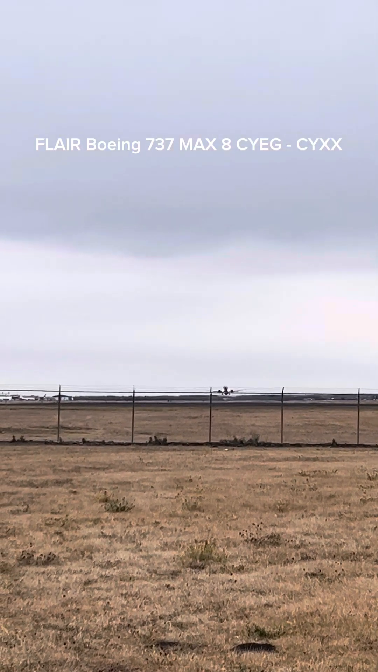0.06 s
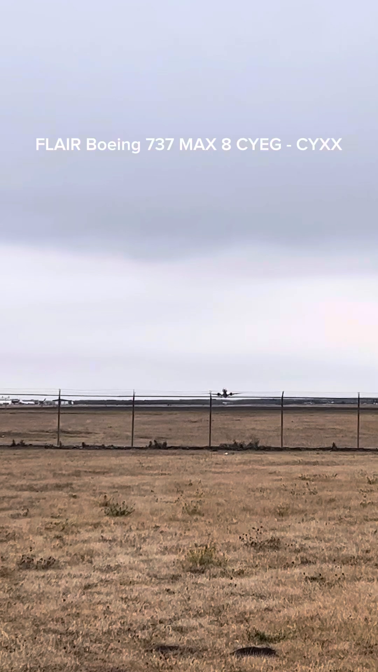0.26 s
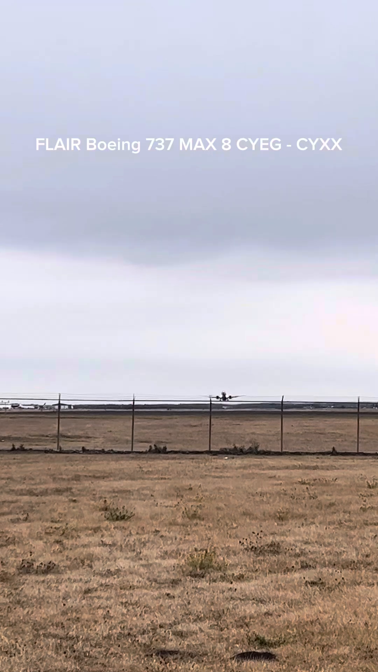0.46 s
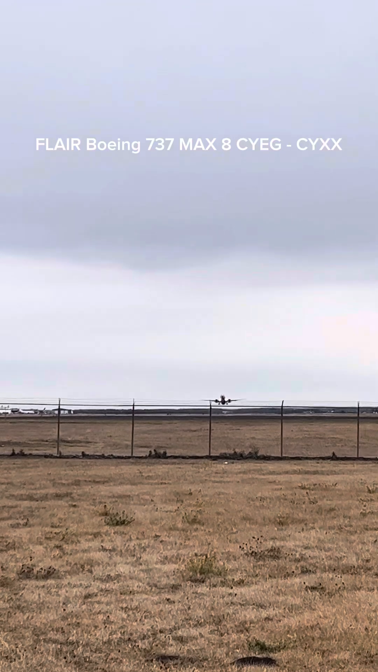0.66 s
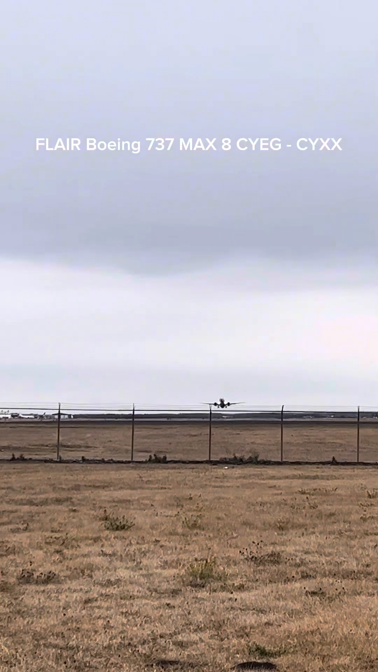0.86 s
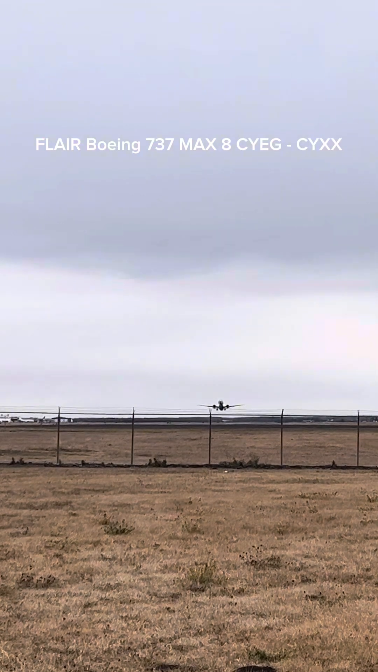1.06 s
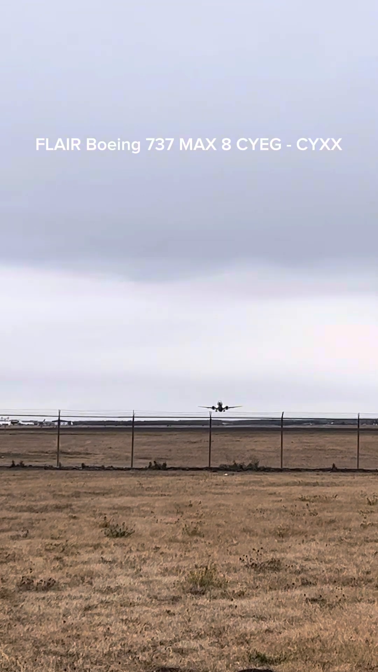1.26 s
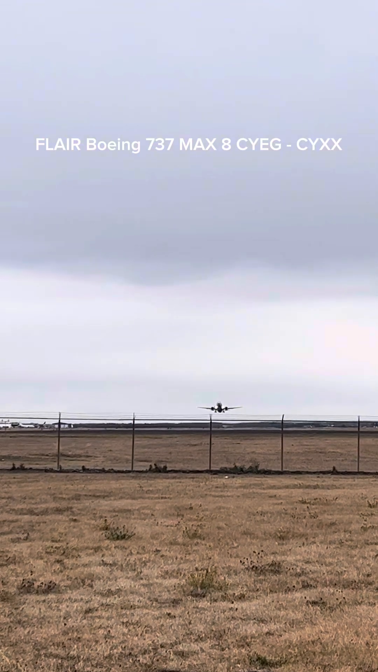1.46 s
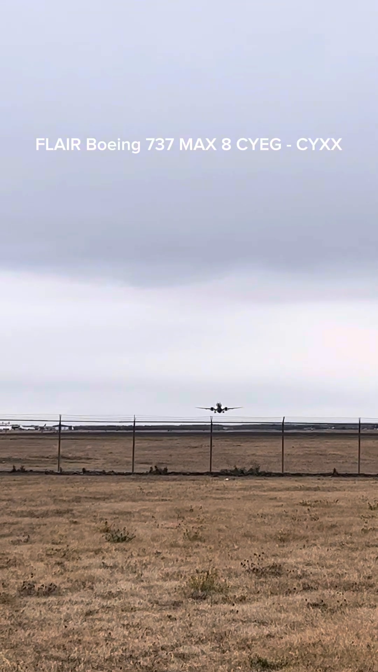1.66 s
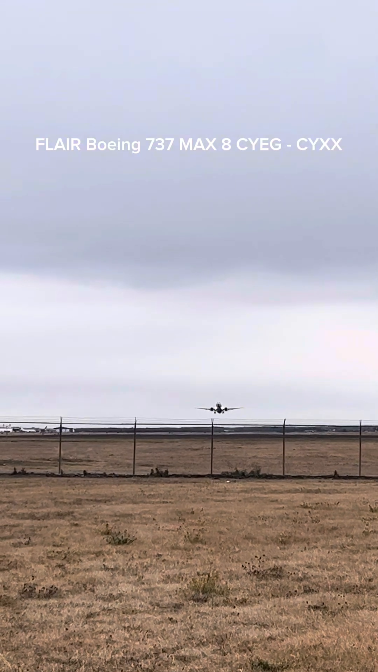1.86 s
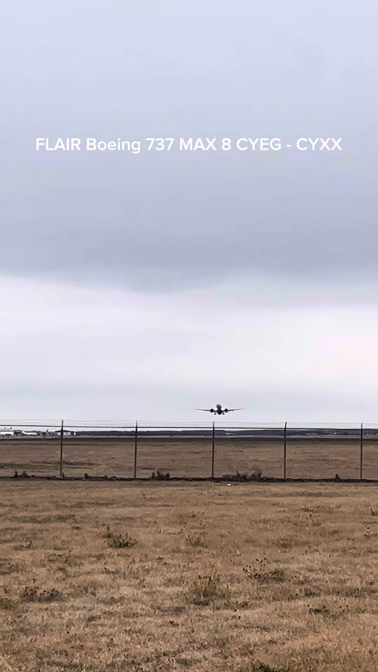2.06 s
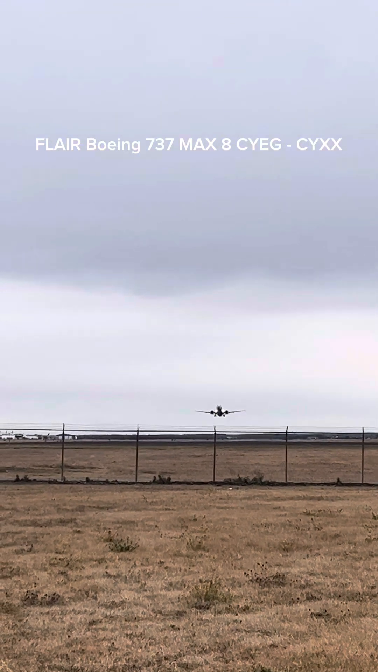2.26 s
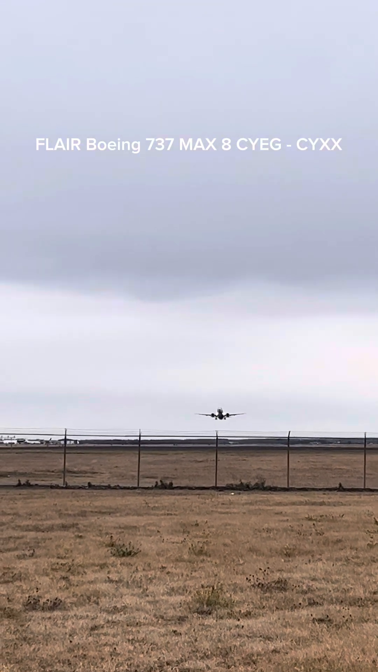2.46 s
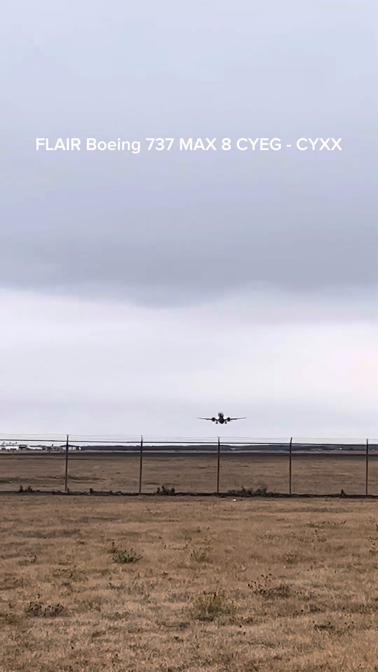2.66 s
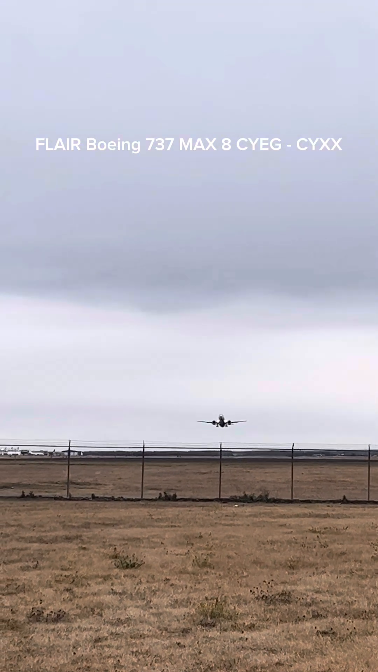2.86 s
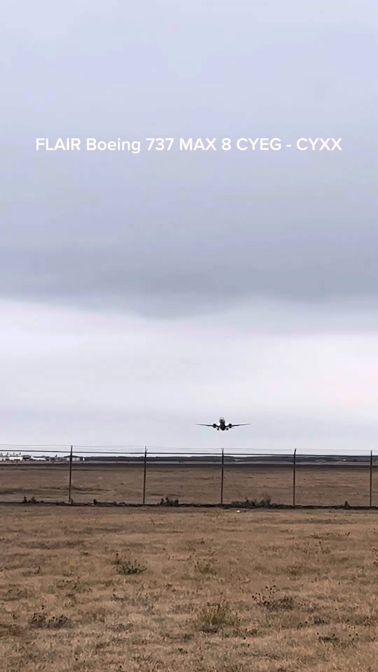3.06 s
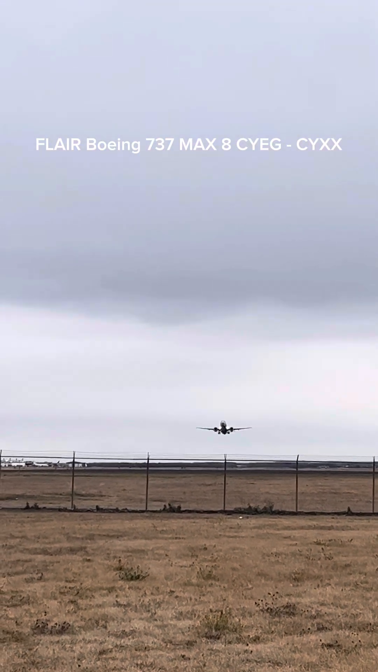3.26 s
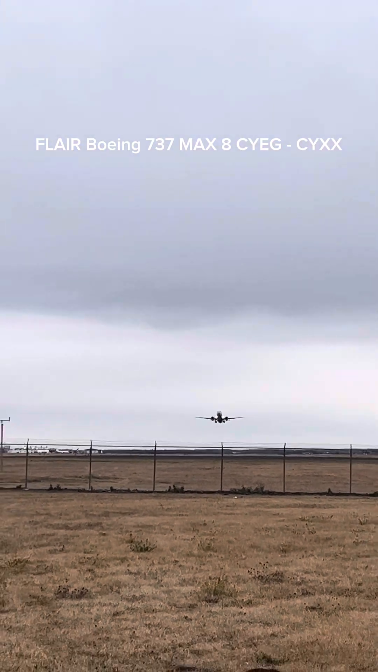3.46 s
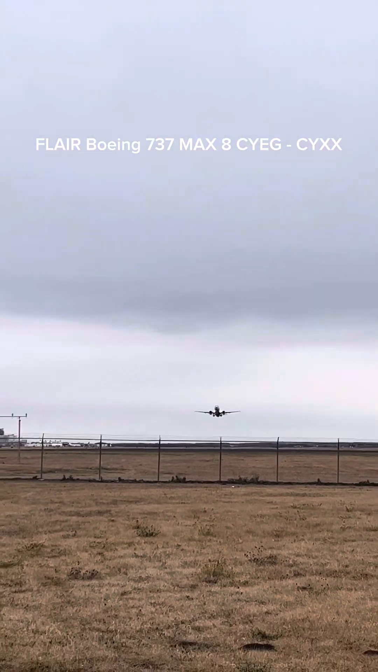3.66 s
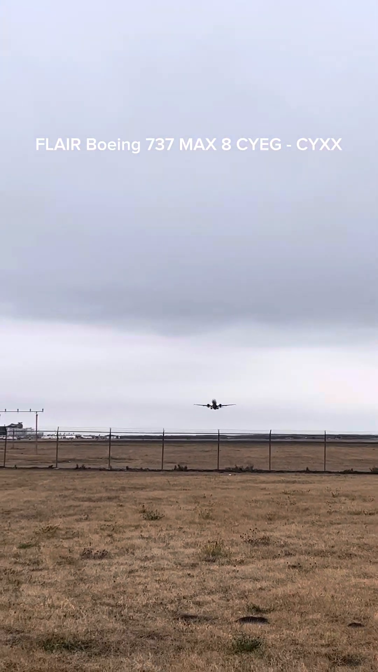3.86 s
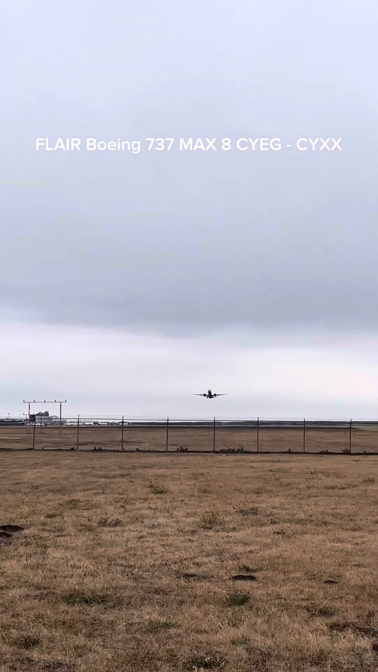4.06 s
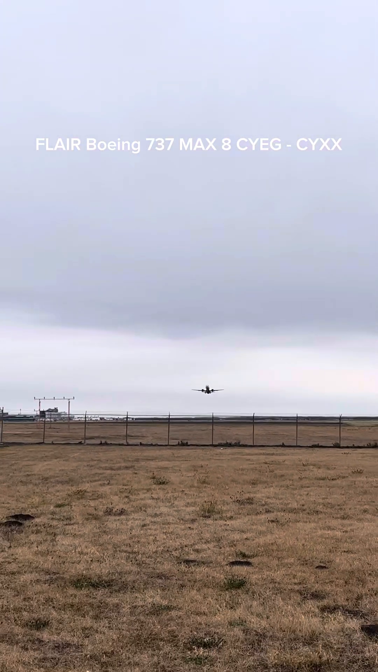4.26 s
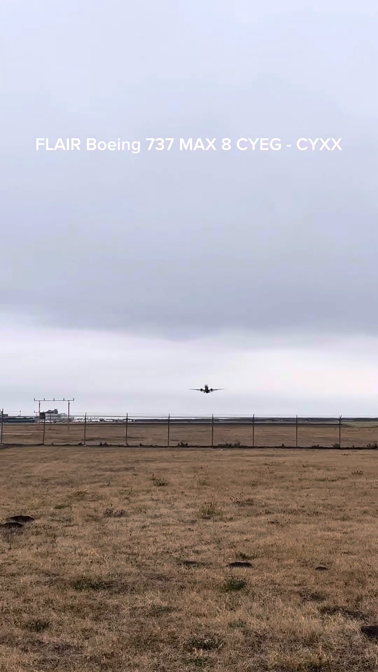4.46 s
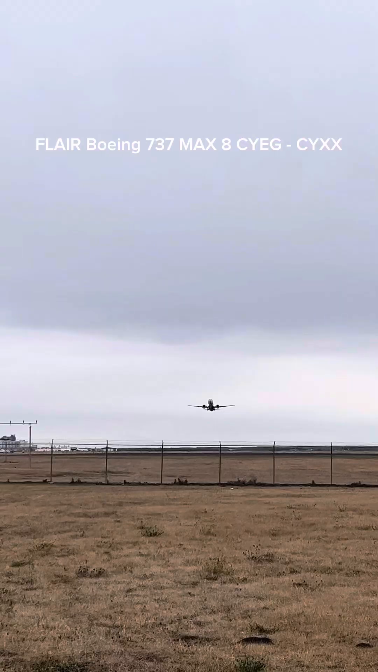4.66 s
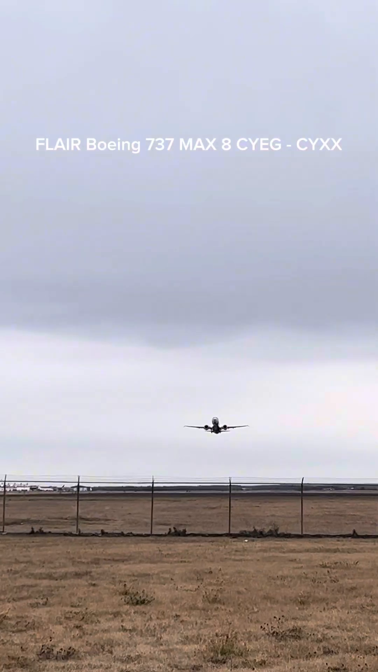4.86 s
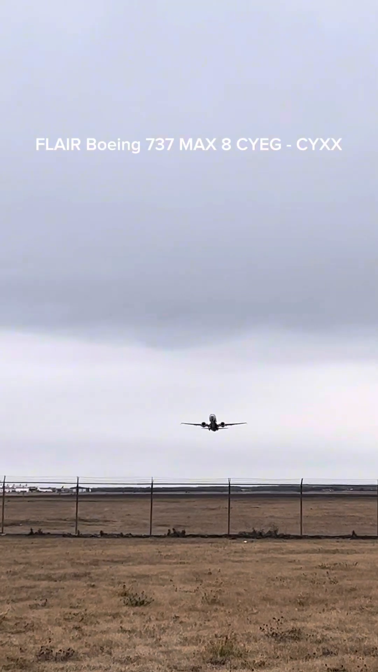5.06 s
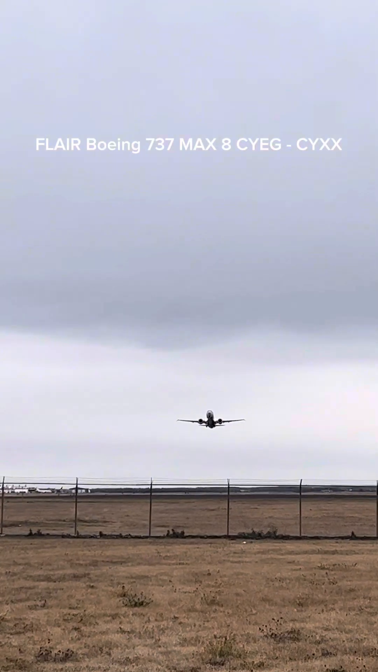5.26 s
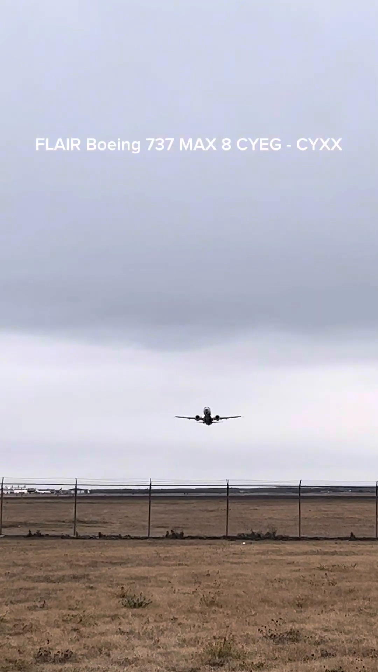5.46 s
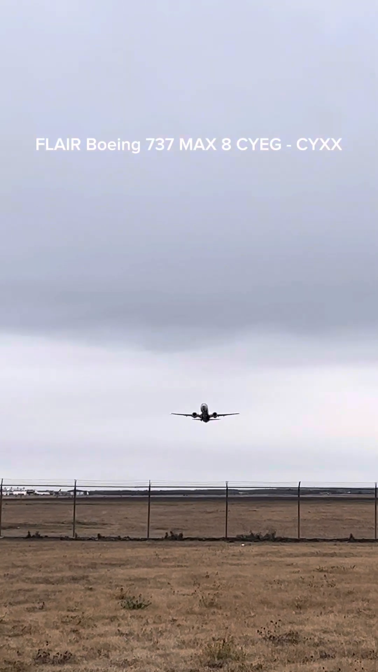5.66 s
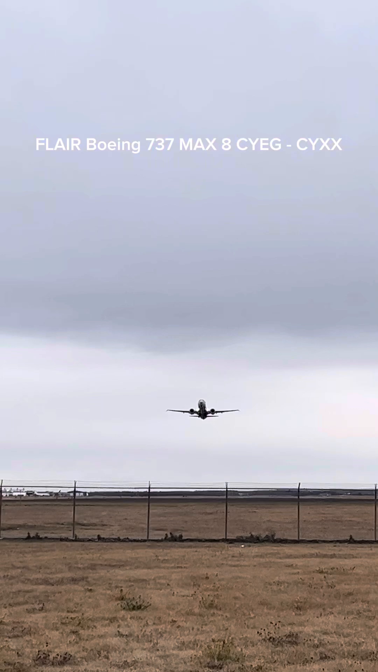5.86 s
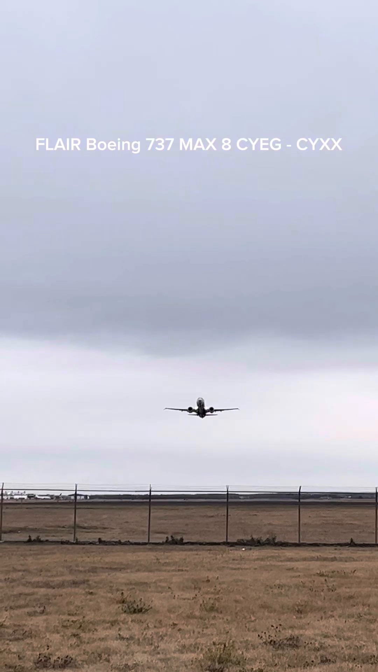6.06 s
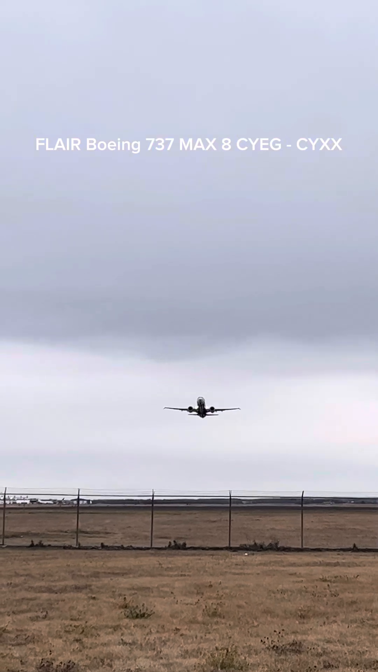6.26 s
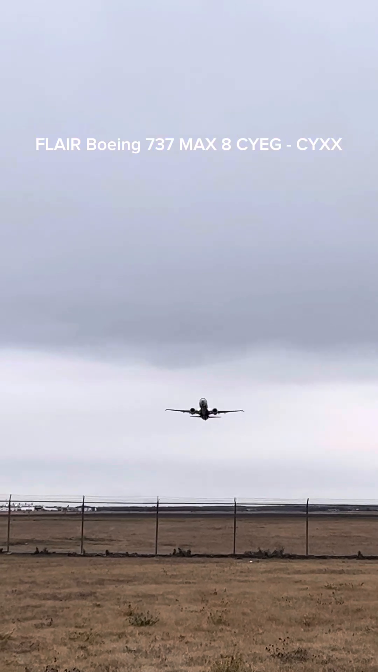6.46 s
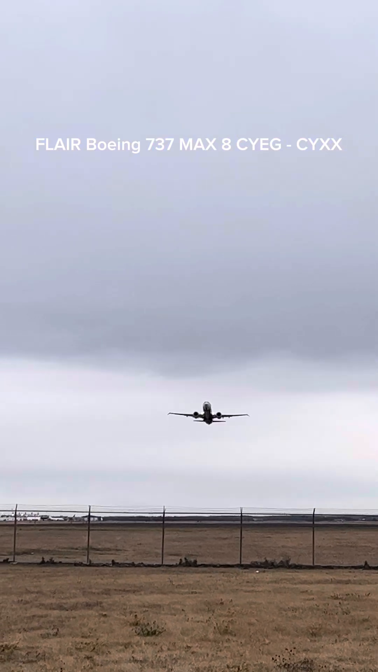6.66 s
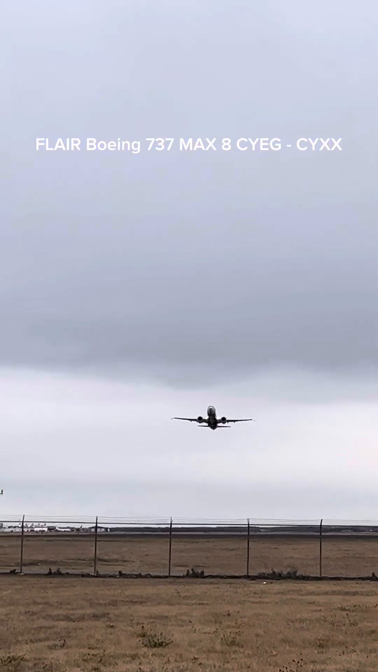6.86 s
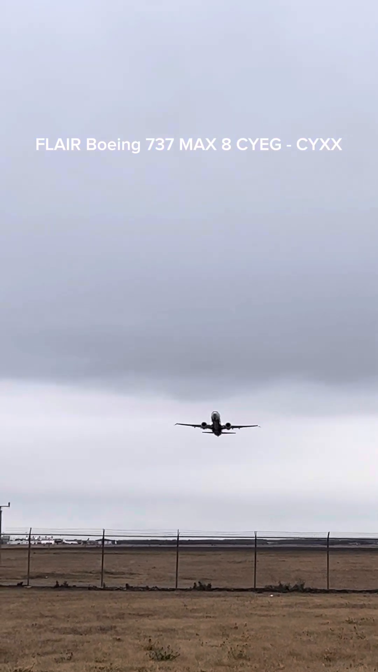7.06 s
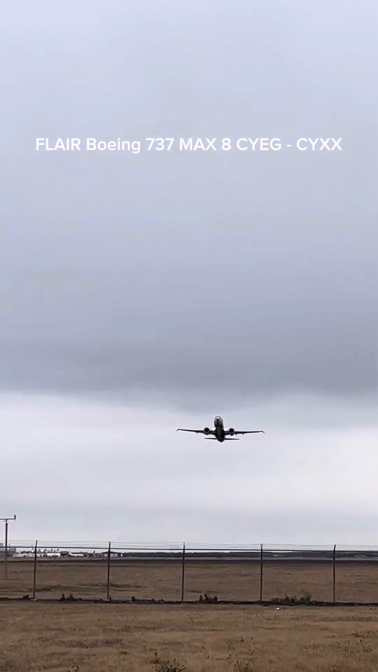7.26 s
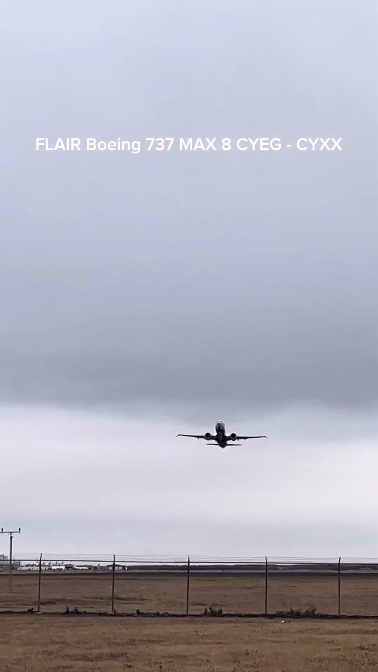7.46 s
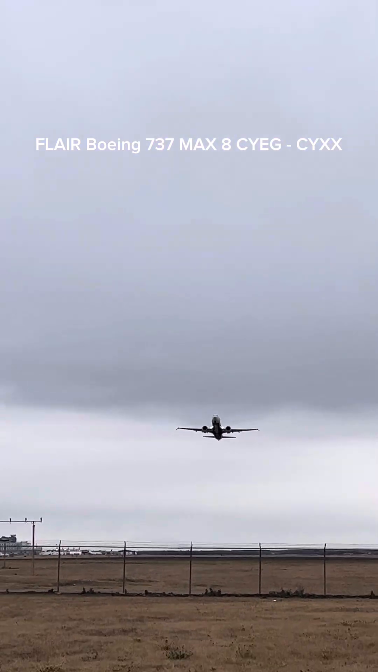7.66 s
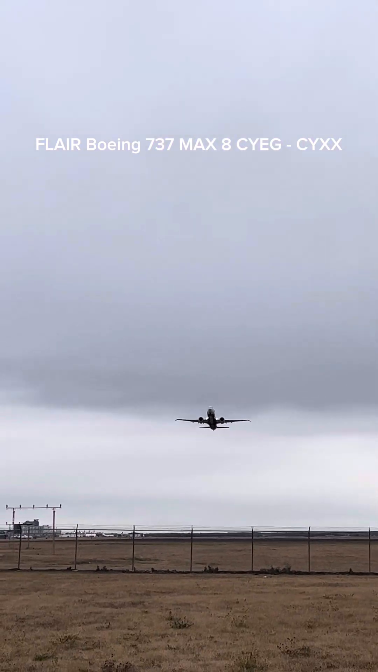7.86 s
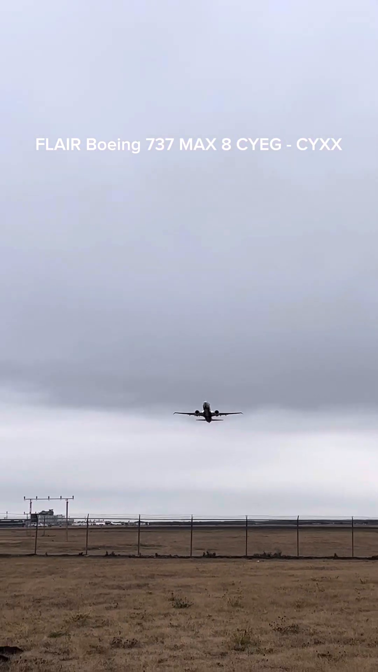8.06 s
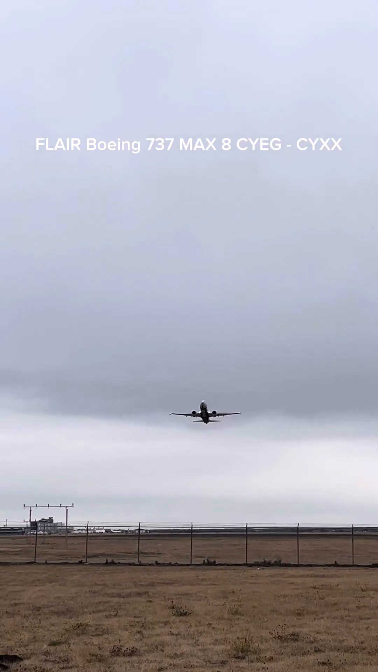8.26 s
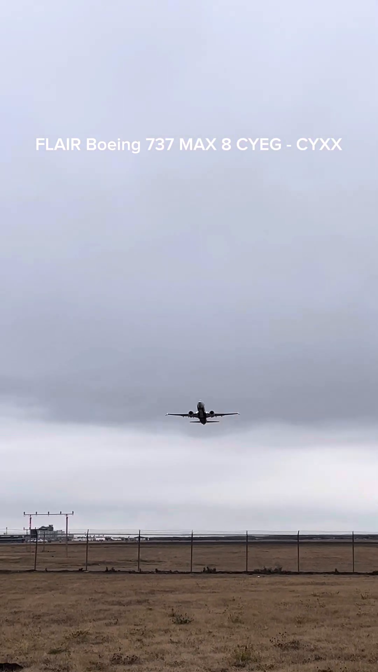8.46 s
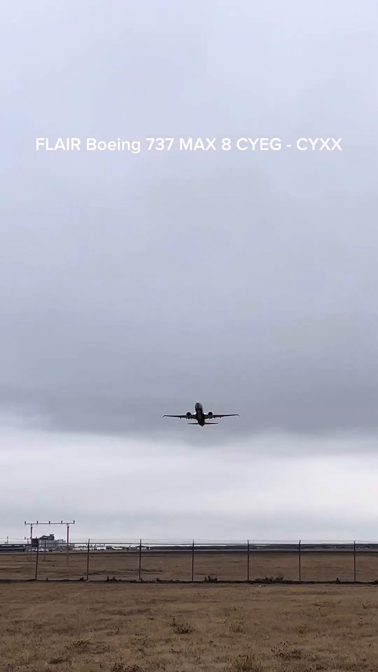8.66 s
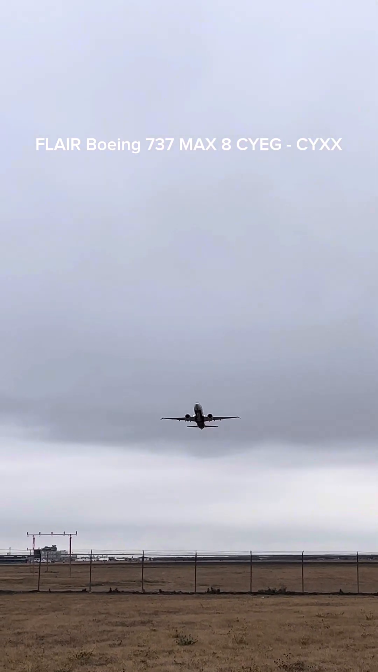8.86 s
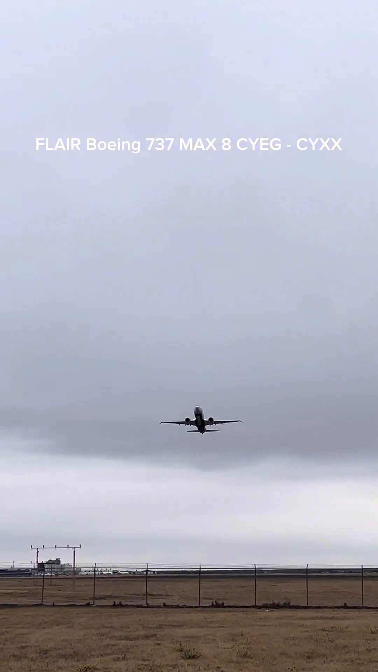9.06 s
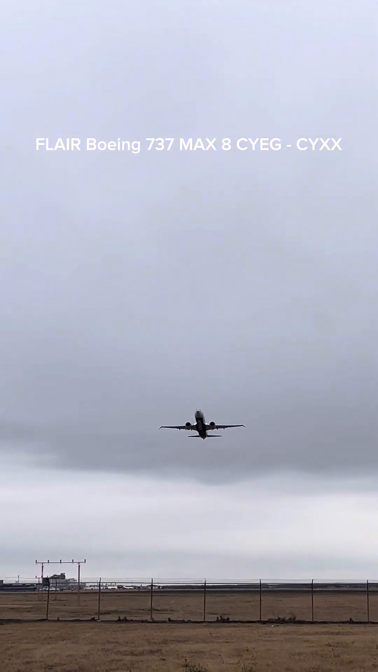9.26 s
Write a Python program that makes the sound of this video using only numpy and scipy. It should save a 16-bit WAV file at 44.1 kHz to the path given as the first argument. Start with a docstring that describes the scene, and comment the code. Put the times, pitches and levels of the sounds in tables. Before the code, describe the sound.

A twin-engine jet climbs toward the listener, low rumble swelling into a roar with a high fan whine, while a truck pulls away nearby.

```python
"""Airliner climbing over a field, truck pulling away

A twin-engine airliner nears a hand-held phone: rumble, roar and hiss are noise shaped frame by frame,
and the fan whine is a pair of wavering sines that swell through gusty air. Beside the field a
six-cylinder truck pulls away through two gears, built from firing tones and the tones of uneven cylinders,
with tyre and traffic noise. Short faint hums come early; knocks on the phone case are a tick and decaying modes.
"""
import sys
import numpy as np
from scipy import signal
from scipy.fft import rfft, irfft, next_fast_len
from scipy.io import wavfile
from scipy.ndimage import uniform_filter1d

SR = 44100
rng = np.random.default_rng(int(sys.argv[2]) if len(sys.argv) > 2 else 0)


def generate_wav(signal):
    """Clip the signal to [-1, 1] and save it as 16-bit WAV at the path in sys.argv[1]."""
    frames = np.transpose(np.atleast_2d(signal))
    scaled = np.clip(frames, -1, 1) * 32767
    pcm = np.round(scaled).astype(np.int16)
    wavfile.write(sys.argv[1], SR, pcm)


N = 410218  # length in samples

# The truck's pull in each gear, one table a gear: [t/s, firing rate f/Hz, load level/dB,
# extra level of the third firing tone/dB, unevenness of the cylinders/dB]
GEARS = [
    [(.8, 66.2, -0.5, 1, -3), (1.05, 69.5, -7, -1, -1.5), (1.8, 71.2, -1, -0.5, -6.5),
     (2.3, 75.26, 0, 3, 1), (3.05, 83.93, -0.5, 3.5, 0.5), (3.3, 86.44, -2.5, 9.5, 1.5),
     (3.55, 89.76, -2, -7, -5), (3.9, 91.5, 0.5, 0, -8.5), (4.1, 93.1, -14.5, 8, -2),
     (4.3, 87.4, -23, -2, -9)],
    [(5.4, 80.3, -8.5, 2.5, 2), (5.8, 80.53, -5, -0.5, -1.5), (6.4, 84.44, 3.5, -3.5, 2.5),
     (7.0, 88.72, 3, 1.5, -1.5), (7.35, 92.4, 3.5, 2, -3), (7.63, 92.94, -0.5, 13, 1.5),
     (7.8, 86.9, -8.5, 21, 3.5)],
]
REFERENCE_FIRING_HZ = 80  # truck levels that grow with speed are set at this firing rate


def gain_of(db):
    """Amplitude ratio of a level in dB."""
    return 10 ** (np.asarray(db) / 20)


def evened(x):
    """Scales x to an RMS of 1."""
    return x / np.sqrt(np.mean(x ** 2) + 1e-20)


def read(points, hz):
    """Reads a curve of (f/Hz, value) points, straight over log frequency."""
    f, value = np.transpose(points)
    return np.interp(np.log(hz + 1), np.log(f + 1), value)


def colour(points, hz):
    """A noise spectrum scaled to power 1, silent above its last point."""
    gain = gain_of(read(points, hz)) * (hz <= points[-1][0])
    return gain / np.linalg.norm(gain)


def drift(t, top_hz):
    """Slow chance movement of RMS 1: sines of random phase up to top_hz, the slow ones stronger."""
    rates_hz = np.geomspace(top_hz / 12, top_hz, 24)
    return evened(sum(np.sin(2 * np.pi * (f * t + rng.random())) / np.sqrt(f) for f in rates_hz))


def tone(t, hz, db, wobble_db, wobble_hz):
    """A sine at an RMS level in dB, whose strength and phase waver in the moving air."""
    phase = 2 * np.pi * np.cumsum(hz) / SR + .25 * drift(t, wobble_hz)
    strength = np.sqrt(2) * gain_of(db + wobble_db * drift(t, wobble_hz))
    return strength * np.sin(phase)


def shaped(x, gain_at):
    """Filters x by a gain, possibly complex, that depends on frequency."""
    size = next_fast_len(N + SR // 2)
    return irfft(rfft(x, size) * gain_at(np.fft.rfftfreq(size, 1 / SR)), size)[..., :N]


def jet_layers(t):
    """Jet noise as (spectrum, level/dB over t) layers that rise as the aircraft nears and turns its inlets."""
    # Aircraft's pass: [t/s, gain from nearing/dB, gain while the fan inlets face the listener/dB,
    # swell of the fan hiss/dB]
    jet = [(0, 1.5, -4.5, 1), (.7, 0, -0.5, -3.5), (2.7, -1.5, 0.5, 2.5), (3.7, 8, -0.5, 0),
           (4.301, 6, 1.5, 2), (4.699, 4.5, 2.5, 1.5), (5.6, 12, 0, 0), (6.299, 14.5, 2.5, -2),
           (6.749, 18, 1, -1.5), (7.1, 23, 4.5, 2.5), (7.399, 27, 1.5, 2.5), (7.6, 27.5, 1, 2.5),
           (7.8, 27.5, 3.5, -3.5), (8.1, 28, 1.5, -1), (8.6, 29, 1.5, 0), (8.75, 28, -3, 3),
           (9.3, 28, -4.5, 3.5)]
    # Noise colours, from exhaust to fan: [f/Hz, relative level per Hz/dB]
    rumble = [(25, -9), (60, 8), (110, 4.5), (170, -2.5), (260, -13), (420, -25), (900, -76.5)]
    roar = [(120, -35.5), (230, 3.5), (400, 8), (520, 1.5), (650, 8.5), (900, -3), (1500, -43)]
    low_roar = [(90, -23), (160, 2.5), (300, -6.5), (450, -17), (900, -28)]
    fan_roar = [(500, -20.5), (900, -2), (1300, -0.5), (1600, -7.5), (1850, -17), (2500, -61.5)]
    fan_hiss = [(1200, -41), (1700, 1), (2150, -1), (2500, -8.5), (3200, -51)]
    treble = [(1800, -31), (2600, 0.5), (3400, -4.5), (4200, -14.5), (5200, -24.5), (5900, -60.5)]
    # Top treble hiss: [f/Hz, relative level per Hz/dB]
    air = [(3000, -39), (4500, -7.5), (5900, -12), (7600, -3.5), (9600, -1), (10400, -14), (12000, -9.5),
           (13600, -12)]
    # Top treble opening late in the scene: [t/s, level/dB]
    air_db = [(0, -91.5), (7.5, -87.5), (8, -76.5), (9.3, -72.5)]
    # Brief blooms of the treble hiss: [t/s, half length/s, rise/dB]
    blooms = [(7.247, .2, 1.5), (8.502, 0.15, 4)]

    s, near_db, facing_db, swell_db = np.transpose(jet)
    bloom_db = sum(db * np.exp(-((t - at) / half) ** 2) for at, half, db in blooms)

    def level(far_db, per_near_db, per_facing_db, extra_db=0):
        return np.interp(t, s, far_db + per_near_db * near_db + per_facing_db * facing_db + extra_db)

    return [
        (rumble, level(-35, 0.34, 0.67)),
        (roar, level(-56.5, 0.9, -0.32)),
        (fan_roar, level(-58, 0.98, 0.88)),
        (fan_hiss, level(-70.5, 0.96, 0.57, swell_db)),
        (treble, level(-77.5, 0.89, -0.85) + bloom_db),
        (low_roar, level(-64.5, 0.86, -2.9)),
        (treble, -69.5 - 18 * t),  # a thin hiss dies away at the start, in dB and dB a second
        (air, np.interp(t, *np.transpose(air_db))),
    ]


def wash():
    """Jet and road noise as random short-time spectra, patchy where gusts bend the path."""
    # Ground echo cancelling a band of the noise, mostly lower as the aircraft climbs:
    # [t/s, centre f/Hz, level change/dB]
    dip = [(6.5, 1937, 0), (7.2, 1856, -1.5), (7.7, 1890, 0.5), (8.05, 1860, -3), (8.4, 1870, 0),
           (8.75, 1685, -9.5), (9.1, 1620, -7), (9.3, 1576, -4.5)]
    # Left-right likeness of the noise: [f/Hz, correlation]
    same_points = [(60, 1), (300, 1), (700, 0.97), (1400, 0.98), (6000, 0.9), (12000, 0.8)]
    # Tyre, engine and traffic noise: [f/Hz, relative level per Hz/dB]
    road_colour = [(90, -23.5), (160, 0), (300, -5.5), (450, -7.5), (900, -12), (2000, -33.5), (3500, -41),
                   (5000, -73.5)]
    hop, size = 512, 2048  # samples
    dip_width_hz = 170

    frames, hz = N // hop + 5, np.fft.rfftfreq(size, 1 / SR)
    t = np.arange(frames) * hop / SR
    layers = jet_layers(t) + [(road_colour, road_db(t))]
    gain = np.sqrt(sum(np.outer(colour(c, hz), gain_of(db)) ** 2 for c, db in layers))
    dip_s, dip_hz, dip_db = np.transpose(dip)
    dip_shape = np.exp(-((hz[:, None] - np.interp(t, dip_s, dip_hz)) / dip_width_hz) ** 2)
    gain *= gain_of(np.interp(t, dip_s, dip_db) * dip_shape)

    a, b, c, d, patches = rng.standard_normal((5, len(hz), frames))
    patches = evened(uniform_filter1d(uniform_filter1d(patches, 16, 0), 8, 1))
    same = np.clip(read(same_points, hz), -1, 1)[:, None]
    left = a + 1j * b
    right = same * left + np.sqrt(1 - same ** 2) * (c + 1j * d)
    spectra = np.array([left, right])

    # the steep mean colour is applied last, so that loud bass does not smear into the treble
    usual = gain.mean(1) + 1e-12
    gusts_db_gain = gain_of(.9 * patches + .5 * drift(t, 5.8))
    spectra *= gain / usual[:, None] * gusts_db_gain
    flat = signal.istft(spectra, nperseg=size, noverlap=size - hop)[1][:, :N]
    return 1.28 * shaped(flat, lambda f: np.interp(f, hz, usual))  # lifts all the noise layers


def whine():
    """Blade-rate tone of the fans and its overtone; the pitch creeps up as the aircraft gathers speed."""
    # Whine fading in and out through the moving air: [t/s, blade tone level/dB, overtone level/dB]
    levels = [(0, -68, -100), (1, -70, -100), (3.1, -65, -92), (3.25, -56.5, -99.5), (3.4, -65, -94),
              (3.52, -55, -100), (4.201, -55.5, -102.5), (4.7, -50, -88), (4.95, -63.5, -84),
              (5.55, -56, -81), (5.85, -52, -72.5), (6.35, -53.5, -84), (6.849, -35, -61),
              (7.08, -32.5, -62.5), (7.3, -27.5, -72.5), (7.6, -41.5, -59), (7.95, -29.5, -63.5),
              (8.249, -27.5, -60), (8.36, -34.5, -65.5), (8.42, -26, -47), (8.58, -30.5, -51),
              (8.75, -40, -60), (9.0, -37.5, -63), (9.15, -55, -68), (9.3, -30, -54)]
    top_hz, short_hz, settle_s = 1481, 55, 3.6  # the blade rate closes in on its top
    t = np.arange(N) / SR
    hz = top_hz - short_hz * np.exp(-t / settle_s)
    s, low_db, high_db = np.transpose(levels)
    low_wobble_db = np.interp(t, [3, 3.6], [4.5, 1.1])  # steadier after the first seconds
    low = tone(t, hz, np.interp(t, s, low_db), low_wobble_db, 18)
    high = tone(t, 2 * hz, np.interp(t, s, high_db), 2., 25)
    return low + high


def truck():
    """Three firings a turn, coloured by the exhaust pipe; cylinders that differ add tones at single turns."""
    # Exhaust pipe response: [f/Hz, level/dB]
    pipe = [(66, -46), (70, -24), (78, -23), (85, -31), (92, -41.5), (135, -53.5), (147, -43), (160, -39.5),
            (172, -34), (186, -34), (200, -67), (250, -55), (278, -40.5)]
    # Tones of the uneven cylinders: [multiple of the shaft's turning rate, relative level/dB]
    uneven = [(2, 9), (4, 11), (7, -7), (8, -10), (10, 0), (11, -9), (12, 3), (13, 0), (15, -6), (16, -4),
              (17, -7), (18, -4)]
    # Lowest firing tone, weaker in the higher gear: [level/dB], one a gear
    drone_levels = (0, -9)
    uneven_levels, uneven_db_per_hz = (-54.5, -61), 0.78  # dB a gear at the reference rate; rise with speed
    panel_hz, panel_width_hz, panel_db = 292, 16, 6  # body resonance lifting uneven tones that cross it

    out = np.zeros(N)
    for gear, gear_db, drone_db in zip(GEARS, uneven_levels, drone_levels):
        s, *columns = np.transpose(gear)
        t = np.arange(s[0], s[-1], 1 / SR)
        hz, load_db, bite_db, rough_db = (np.interp(t, s, c) for c in columns)
        sound = np.zeros(len(t))
        for k in range(1, 4):
            db = load_db + read(pipe, k * hz) + bite_db * (k == 3) + drone_db * (k == 1)
            sound += tone(t, k * hz, db, 0.3, 5)
        uneven_db = gear_db + load_db + rough_db + uneven_db_per_hz * (hz - REFERENCE_FIRING_HZ)
        for k, db in uneven:
            turn_hz = k * hz / 3
            lift_db = panel_db * np.exp(-((turn_hz - panel_hz) / panel_width_hz) ** 2)
            sound += tone(t, turn_hz, uneven_db + db + lift_db, 1.6, 4)
        out[round(s[0] * SR):][:len(t)] += sound * signal.windows.tukey(len(t), .08)
    return out


def road_db(t):
    """Level of far traffic plus the truck's tyre and engine wash, which grows with speed and load."""
    traffic_db = -52.5
    wash_levels, wash_db_per_hz = (-48, -46.5), .5  # dB a gear at the reference rate; rise with speed
    power = gain_of(traffic_db + 0 * t) ** 2
    for gear, gear_db in zip(GEARS, wash_levels):
        s, hz, load_db, *_ = np.transpose(gear)
        wash_db = gear_db + load_db + wash_db_per_hz * (hz - REFERENCE_FIRING_HZ)
        power += gain_of(np.interp(t, s, wash_db, -120, -120)) ** 2
    return 10 * np.log10(power)


def knocks():
    """A thin tick at first touch, then the case rings for a few cycles; held so it sounds lower, it rings longer."""
    # Knocks on the case: [t/s, ring peak level/dB, extra level of the modes above 1 kHz/dB,
    # pitch ratio set by the grip (the modes above 1 kHz move by its square root)]
    blows = [(1.8637, -28, -6, .7), (2.6245, -31, -8, 1), (2.6285, -27, -8, 1.2), (2.647, -27, 3, .82),
             (3.0755, -18, 3, .72), (3.092, -28, -1, 1.1), (4.128, -32, -2, 1.25), (4.475, -1.5, 0, 1),
             (4.4865, -29, -10, .8), (5.040, -32, -4, 1.15), (5.7732, -25, -6, 1.22),
             (5.7746, -24, -8, .66)]
    # Modes of the case at grip ratio 1: [f/Hz, level/dB, t60/s]
    case = [(350, -13, .0114), (620, -16, .015), (764, 0, .0076), (1196, -17, .008), (1430, -4, .0056)]
    # Colour of the first touch: [f/Hz, relative level per Hz/dB]
    tick_colour = [(1500, -8), (2300, 0), (3200, 3), (4200, -6), (5200, -1), (6300, -11), (7900, 2),
                   (9500, -6), (10300, -26), (11300, -14), (13500, -26)]

    out, t = np.zeros(N), np.arange(2048) / SR
    hz = np.fft.rfftfreq(len(t), 1 / SR)
    late = np.maximum(t - .002, 0)  # the case answers just after the tick
    tick = irfft(colour(tick_colour, hz) * np.exp(-2j * np.pi * hz * .0018))  # delayed by 1.8 ms
    tick /= abs(tick).max()
    for s, db, upper_db, grip in blows:
        ring = np.zeros(len(t))
        for f, mode_db, t60 in case:
            upper = f > 1000
            mode_hz = f * grip ** (.5 if upper else 1)
            fall_db = 60 * late / t60 * min(grip, 1) ** 2
            ring -= gain_of(mode_db + upper_db * upper - fall_db) * np.sin(2 * np.pi * mode_hz * late)
        ring *= 1 - np.exp(-(late / .0025) ** 2)  # the ring builds up softly
        ring /= abs(ring).max()
        tick_gain = gain_of(-19.5 + 0.61 * db)  # relative to the ring: a harder blow ticks more
        start = round((s - .0015) * SR)
        out[start:start + len(t)] += gain_of(db) * (ring + tick_gain * tick)
    return out


def hums():
    """Short broken tones that glide slightly, waver, and fade in and out."""
    # Faint hums from far across the field: [start t/s, end t/s, first f/Hz, last f/Hz, level/dB]
    far_hums = [(.05, .72, 609, 614, -59), (0, .95, 381, 390, -56), (1.05, 1.58, 392, 396, -56),
                (1.15, 1.85, 751, 759, -56.5), (1.1, 1.95, 199, 196, -49), (1.25, 1.7, 654, 657, -61),
                (1.3, 1.7, 624, 628, -61), (.15, 1.05, 215, 212, -52), (.1, .55, 511, 513, -63)]
    out = np.zeros(N)
    for start, end, first_hz, last_hz, db in far_hums:
        t = np.arange(start, end, 1 / SR)
        hz = np.linspace(first_hz, last_hz, len(t)) * (1 + .006 * drift(t, 14))
        hum = tone(t, hz, db, 3.5, 32) * signal.windows.tukey(len(t), .3)
        out[round(max(start, 0) * SR):][:len(t)] += hum
    return out


def ports(x):
    """Two microphone ports: each sound reaches them with a phase lead and a level tilt set by frequency."""
    # Phase by which the left port leads: [f/Hz, phase/rad]
    lead = [(30, -.03), (85, -.07), (180, -.2), (350, -.55), (600, -.65), (950, -.3), (1800, .1),
            (2550, 2.1), (3100, 1.6), (10000, 1.6), (12000, .4)]
    # Left minus right: [f/Hz, level/dB]
    tilt = [(140, 0), (340, -1.5), (800, .5), (1230, 2.2), (2900, 0)]

    def port_gains(hz):
        left = gain_of(read(tilt, hz) / 2) * np.exp(.5j * read(lead, hz))
        return left ** np.array([[1], [-1]])  # the right port gets the inverse

    return shaped(x, port_gains)


def scene():
    """Aircraft, truck, knocks and far hums together; the noise is already stereo."""
    return wash() + whine() + truck() + knocks() + hums()


def record(dry):
    """The port pair, the microphone's bass cut, a soft switch-on and switch-off, and the band limit."""
    edge_hz = 13500
    heard = ports(dry * signal.windows.tukey(N, .002))
    heard = signal.sosfilt(signal.butter(6, 36, "high", fs=SR, output="sos"), heard)
    band_limit = signal.firwin(511, edge_hz, window=("kaiser", 9), fs=SR)
    return signal.oaconvolve(heard, band_limit[None], "same")


dry = scene()
out = record(dry)
generate_wav(out)
```